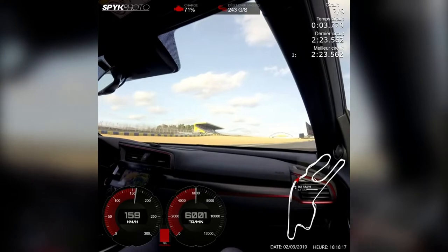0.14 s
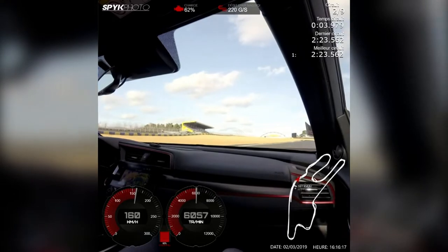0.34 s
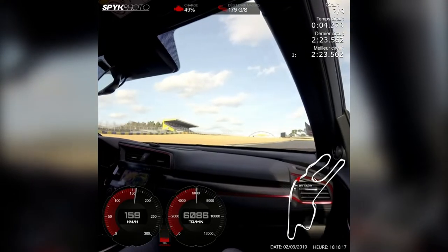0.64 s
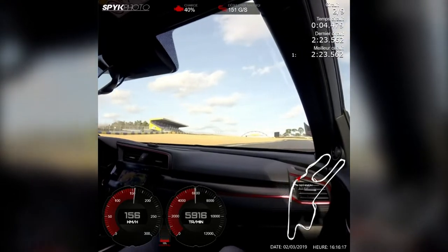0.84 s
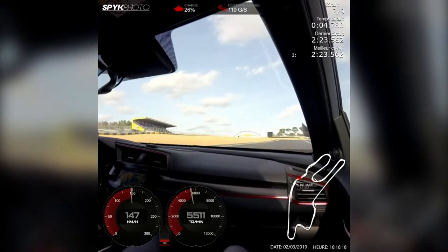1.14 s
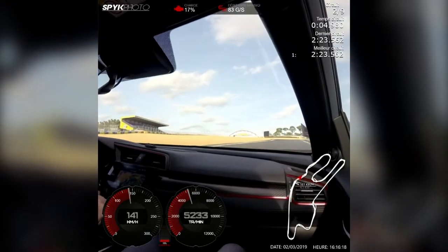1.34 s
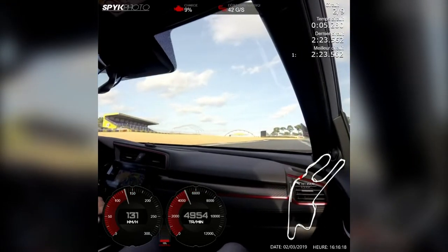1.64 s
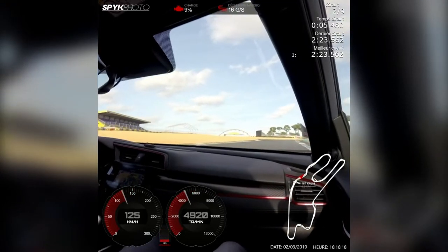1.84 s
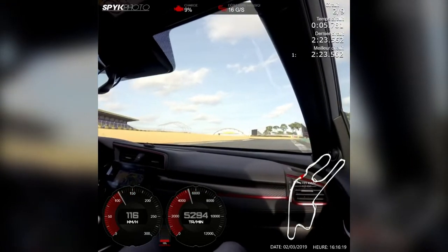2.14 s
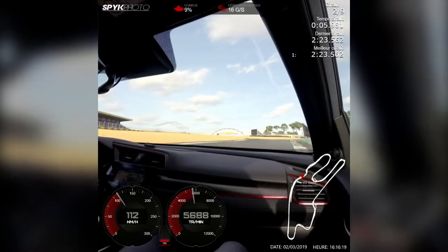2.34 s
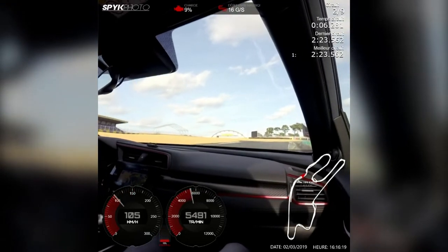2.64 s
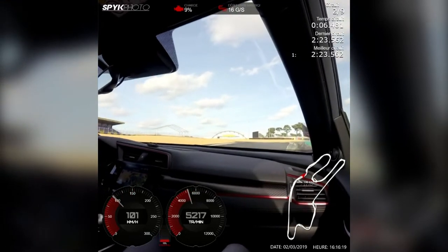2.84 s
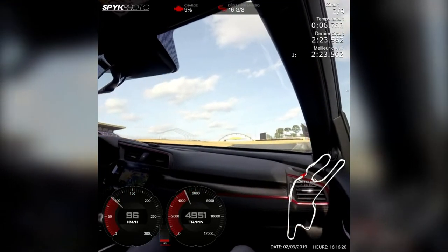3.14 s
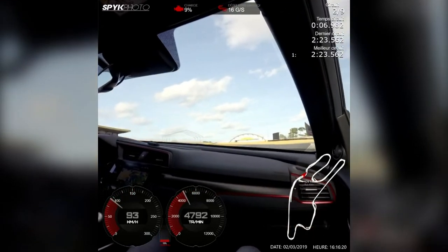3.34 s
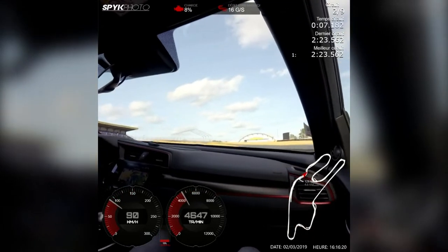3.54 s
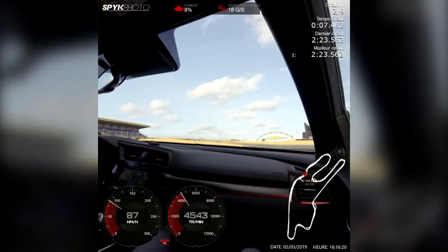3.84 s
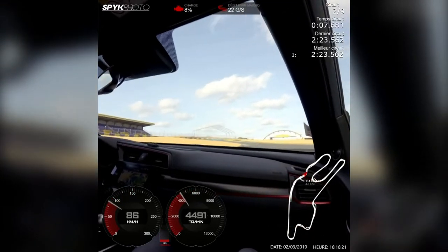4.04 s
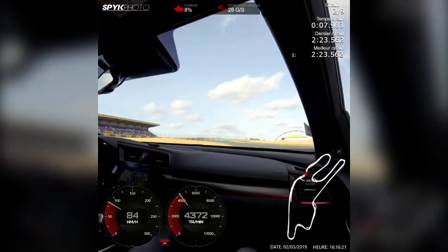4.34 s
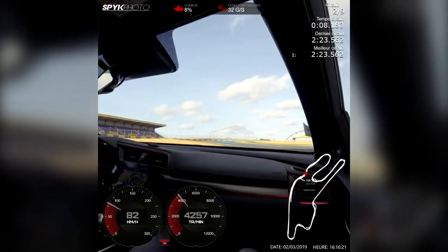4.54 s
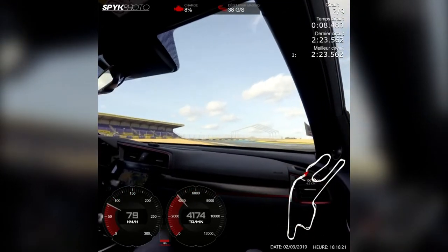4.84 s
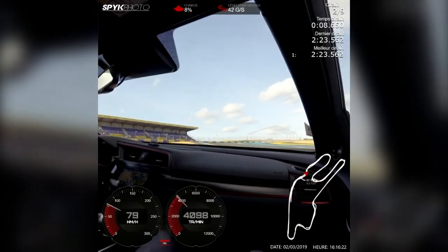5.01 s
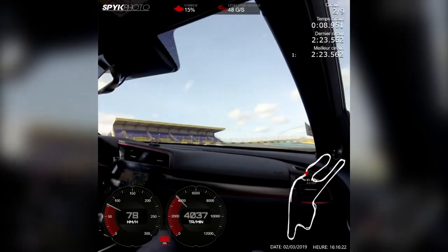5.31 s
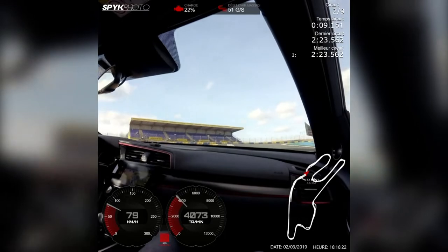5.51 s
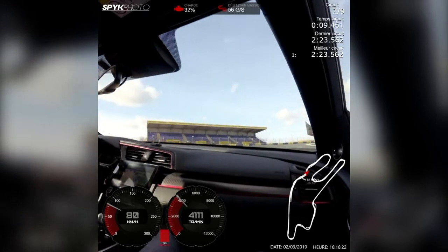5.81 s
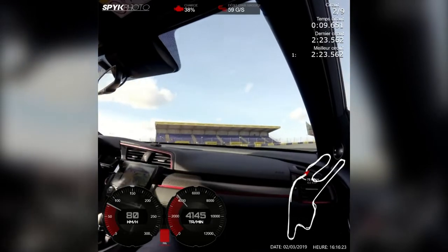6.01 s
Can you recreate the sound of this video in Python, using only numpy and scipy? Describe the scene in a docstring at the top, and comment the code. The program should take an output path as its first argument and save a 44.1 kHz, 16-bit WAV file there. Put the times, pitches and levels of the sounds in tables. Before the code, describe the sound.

The listener sits inside a turbocharged four-cylinder car on a race track, with short cabin reflections and a boomy body. From 0 to 0.7 s the engine runs flat out, high and raspy, over strong tyre roar and wind hiss. Around 0.6-0.9 s the throttle closes, the rasp drops away and a faint breathy turbo whistle slides down. The engine note falls under braking, with a trim rattle at 1.15 s and a bump at 1.5 s. From about 1.9 to 2.5 s it climbs in a downshift blip, then sinks. Between 2.7 and 3.9 s ribbed kerb blows drum heavily in bursts, with rattling plastic and a metallic clink near 3.45 s. At 4.07 s road noise drops sharply, then slowly returns over a low coasting drone. From 5.35 to 5.8 s uneven kerb thuds land with a faint tyre squeal; the engine rises slightly at the end.

```python
"""The engine of a turbocharged four-cylinder car drones, growls and rasps, heard from inside on a race track.
It runs flat out, brakes with a blip for the downshift, coasts and pulls lightly: sines and firing pulses.
Shaped noise makes tyre roar, wind and grit, which dip after the first kerb and slowly come back.
In two spells the wheels run over a ribbed kerb, a row of timed blows; bumps and trim are blows that ring
resonances too. Gliding tones make the turbo whistle and a faint tyre squeal."""
import sys
import numpy as np
from scipy import signal
from scipy.fft import rfft, irfft, next_fast_len
from scipy.io import wavfile
from scipy.ndimage import uniform_filter1d, map_coordinates

SR = 44100
rng = np.random.default_rng(int(sys.argv[2]) if len(sys.argv) > 2 else 0)


def transcribe(signal):
    """Save signal, clipped to [-1, 1], as a 16-bit WAV file at the path in sys.argv[1]."""
    frames = np.atleast_2d(signal).T
    limited = np.clip(frames, -1, 1)
    pcm = np.round(limited * 32767).astype(np.int16)
    wavfile.write(sys.argv[1], SR, pcm)


N = 272097


def amp(db):
    """Turn decibels into a gain."""
    return 10 ** (np.asarray(db) / 20)


def unit(x):
    """Scale to an rms of 1."""
    return x / np.sqrt(np.mean(x ** 2) + 1e-20)


def curves(rows):
    """Join the points of a table with straight lines: one curve for each column after the time."""
    times, *columns = np.transpose(rows)
    return [np.interp(np.arange(N) / SR, times, column) for column in columns]


def wobble(knots_per_s):
    """Draw a smooth curve through random knots."""
    knots = rng.standard_normal(int(N * knots_per_s / SR) + 4)
    return map_coordinates(knots, [np.arange(N) * knots_per_s / SR])


def swell(start, end, attack_s, release_s):
    """A gain that rises from start, holds until end and dies away."""
    t = np.arange(N) / SR
    rise = np.clip((t - start) / attack_s, 0, 1)
    return rise * np.exp(-np.maximum(t - end, 0) / release_s)


def filtered(x, response):
    """Multiply the spectrum of x by a response, given as a function of frequency in Hz."""
    m = next_fast_len(N + SR // 2)
    return irfft(rfft(x, m) * response(np.fft.rfftfreq(m, 1 / SR)), m)[:N]


def softened(x, corner_hz):
    """A yielding contact takes the edge off a blow: a gentle low-pass."""
    return filtered(x, lambda f: 1 / (1 + 1j * f / corner_hz) ** 2)


def coloured(x, spectrum):
    """Shape x by (frequency, level) points, then scale to an rms of 1."""
    hz, db = np.transpose(spectrum)
    return unit(filtered(x, lambda f: amp(np.interp(np.log(f + 1), np.log(hz), db))))


def resonate(x, modes):
    """Ring a set of resonances side by side, with alternating signs."""
    def response(f):
        total = 0
        for k, (hz, width_hz, db) in enumerate(modes):
            damping = 1j * f * width_hz
            total = total + (-1) ** k * amp(db) * damping / (hz * hz - f * f + damping)
        return total
    return filtered(x, response)


def rush(spectrum, patchy_db):
    """Noise of rms 1 whose gain varies in random patches of time and pitch."""
    grid = signal.stft(rng.standard_normal(N), nperseg=1024)[2]
    patches = uniform_filter1d(rng.standard_normal(grid.shape), size=6, axis=0)
    patches = uniform_filter1d(patches, size=7, axis=1)
    patchy = signal.istft(grid * amp(patchy_db * unit(patches)), nperseg=1024)[1][:N]
    return coloured(patchy, spectrum)


def passes(turns):
    """The sample times at which a turning phase completes each whole turn."""
    return np.interp(np.arange(1, int(turns[-1])), turns, np.arange(N))


def impulses(at, size):
    """Single clicks; a time between two samples is shared by both."""
    whole, part = np.divmod(np.clip(at, 0, N - 2), 1)
    whole = whole.astype(int)
    return np.bincount(whole, size * (1 - part), N) + np.bincount(whole + 1, size * part, N)


def bursts(at, sizes, t60, rise_s=0.00088):
    """Noise bursts that start at the given sample times and fall by 60 dB in t60 seconds."""
    t = np.arange(SR // 5) / SR
    fade = amp(-60 * t / t60) * (1 - np.exp(-t / rise_s))
    return signal.fftconvolve(impulses(at, sizes), fade)[:N] * rng.standard_normal(N)


def cabin(x, t60, wet):
    """Add dense, short reflections from glass and dashboard: a fading noise tail."""
    t = np.arange(SR // 5) / SR
    tail = rng.standard_normal(len(t)) * amp(-60 * t / t60)
    return x + wet * signal.fftconvolve(x, tail / np.linalg.norm(tail))[:N]


def whistle(rows, knots_per_s):
    """A narrow, breathy tone gliding along a table; more knots a second make it breathier."""
    hz, db = curves(rows)
    phase = 2 * np.pi * np.cumsum(hz) / SR
    return amp(db) * (wobble(knots_per_s) * np.sin(phase) + wobble(knots_per_s) * np.cos(phase))


# road noise without the kerbs; it dips sharply near 4.07 s, after the first kerb, and slowly recovers:
# (time [s], tyre roar level [dB], wind and grit hiss level [dB])
ROAD_NOISE = [(0, -27, -44.5), (.65, -26.5, -42), (.85, -28, -45), (1.6, -29, -47.5), (2.6, -31, -50.5),
              (3.3, -34, -49.5), (3.95, -35.5, -49.5), (4.07, -43, -61.5), (4.25, -39, -59),
              (4.75, -34, -57), (5.3, -29, -52), (6.17, -31.5, -52)]
# wheels on a kerb: (start [s], end [s], rise [s], thud level [dB], timing scatter of the ribs [s],
# share of suspension ringing [0-1], tread roar level [dB], grit hiss level [dB])
KERB_RIDES = [(2.695, 2.807, 0.046, -20, 0.0017, 0.1, -25.5, -51),
              (2.759, 3.204, 0.16, -8.5, .0006, .05, -29.5, -46),
              (3.349, 3.488, 0.031, -11.5, .0006, .1, -34.5, -52),
              (3.528, 3.787, 0.15, -9, 0.00046, 0.08, -32, -45.5),
              (5.35, 5.768, 0.2, -9.5, .005, 0.93, -32, -46.5)]
KERB_RELEASE_S = 0.12  # time constant of the shake dying away


def surface():
    """Gains of kerb shake, tread roar and hiss; road noise and kerbs add in power."""
    roar_db, hiss_db = curves(ROAD_NOISE)
    power = np.array([np.zeros(N), amp(roar_db), amp(hiss_db)]) ** 2
    for start, end, rise_s, thud_db, _, _, tread_db, grit_db in KERB_RIDES:
        gain = swell(start, end, rise_s, KERB_RELEASE_S)
        power = power + np.outer(amp([thud_db, tread_db, grit_db]), gain) ** 2
    return np.sqrt(power)


# noise spectra of body boom, tread roar, grit hiss and airy top: (frequency [Hz], relative level [dB])
BOOM_SPECTRUM = [(12, -38), (33, -6), (50, -19.5), (75, -7.5), (105, 2.5), (135, 0.5), (190, -2),
                 (230, -10), (300, -10.5), (360, -11), (440, -23), (900, -73)]
TREAD_SPECTRUM = [(200, -24.5), (380, 3.5), (470, 1.5), (680, 0.5), (740, -2), (840, -3), (1050, -5.5),
                  (1350, -10), (1500, -22.5), (2000, -23), (3000, -39.5), (8000, -67.5)]
GRIT_SPECTRUM = [(900, -28.5), (1600, 8), (2200, 2.5), (3200, 4), (4000, -0.5), (4800, -6.5), (5220, 1.5),
                 (5800, -4.5), (6500, -9.5), (7500, -18), (9000, -32.5), (15000, -50.5)]
AIR_SPECTRUM = [(3000, -23.5), (7000, 4.5), (9000, 2.5), (10800, 2), (13000, -2), (15000, -2)]
USUAL_ROAR_DB = -30  # boom and air are set for this tread roar
BOOM_DB, BOOM_GROWS = -19, .55  # boom at the usual roar; dB gained per dB of roar
KERB_BOOM_DB = -10  # boom relative to the kerb thuds


def road(shake, roar, hiss):
    """The road booms in the body and roars in the treads; wind and grit hiss at the glass."""
    roar_ratio = roar / amp(USUAL_ROAR_DB)
    boom_gain = np.hypot(amp(BOOM_DB) * roar_ratio ** BOOM_GROWS, amp(KERB_BOOM_DB) * shake)
    boom = boom_gain * rush(BOOM_SPECTRUM, patchy_db=1.5)
    treads = roar * amp(-0.34) * rush(TREAD_SPECTRUM, patchy_db=1.0)
    grit = hiss * amp(0.2 + 1.1 * wobble(60)) * rush(GRIT_SPECTRUM, patchy_db=1.1)
    air = amp(-64.5) * roar_ratio ** .45 * rush(AIR_SPECTRUM, patchy_db=2.5)
    return boom + treads + grit + air


# loose trim: (time [s], relative level [dB], knock against that level [dB], tick against that level [dB])
TRIM_RATTLES = [(0.6937, -28.5, 0.5, -25), (0.8731, -36.5, 0, -12), (1.1543, -21.5, -7.5, -17.5),
                (2.799, -35.5, -6, -13), (2.8893, -37.5, 10.5, -13), (3.176, -37.5, -1, -6),
                (3.342, -23.5, 4, -21.5), (3.3524, -28.5, -4.5, -6.5), (3.3828, -32, -3, -17),
                (3.4141, -37.5, 13.5, -17), (3.4535, -25.5, -2, -9.5), (3.4618, -28, -6, -13),
                (3.706, -31, 5, -24), (3.7703, -30, -2.5, -18.5), (4.5817, -34.5, 0.5, -14.5),
                (4.6813, -41, -6.5, -16), (4.815, -42.5, 0, -24), (5.046, -35, 3.5, -27.5),
                (5.0994, -38.5, -1.5, -19), (5.5502, -27, -7.5, -15.5), (5.6415, -28.5, 2, -30),
                (5.7573, -28, -1, -11), (5.807, -36.5, 2.5, -24)]
# small metal parts: (time [s], level [dB], pitch [Hz], time to fall 60 dB [s])
METAL_CLINKS = [(3.457, -33, 6884, 0.066), (4.592, -53, 7628, 0.14)]
# resonances of the trim, low to high: (frequency [Hz], width [Hz], relative level [dB])
KNOCK_MODES = [(1340, 130, 2.5), (2660, 620, -9), (3800, 850, -9)]
PLASTIC_MODES = [(5150, 360, 4), (6140, 980, -1.5), (7450, 1100, -9.5)]
TICK_MODES = [(7600, 840, -4), (10700, 1600, -7), (12500, 1000, -8)]
TICKS_PER_S = 24
# blow size of the loudest tick against the hiss; range below it; extra gain of its bright edge
TICKING_DB, TICKING_SPREAD_DB, TICKING_TOP_DB = 13.5, 18, -12.5


def trim(hiss):
    """Loose plastic chatters as noise bursts ring its resonances; small metal parts ring as sines."""
    t = np.arange(N) / SR
    times, db, knock_db, tick_db = np.transpose(TRIM_RATTLES)
    at = times * SR
    # the trim also keeps ticking at random times, harder where the hiss is louder
    chance = rng.random((int(TICKS_PER_S * N / SR), 2)).T
    tick_at = chance[0] * (N - 1)
    tick_size = hiss[tick_at.astype(int)] * amp(TICKING_DB - TICKING_SPREAD_DB * chance[1])
    ticking = bursts(tick_at, tick_size, t60=0.033)
    knock_blows = bursts(at, amp(db + knock_db + 14.5), t60=.05) + amp(-1.5) * ticking
    knock = softened(resonate(knock_blows, KNOCK_MODES), corner_hz=7050)
    clack_blows = bursts(at, amp(db + 2), t60=0.045) + ticking
    clack = softened(resonate(clack_blows, PLASTIC_MODES), corner_hz=11000)
    tick_blows = bursts(at, amp(db + tick_db + 12.5), t60=0.037) + amp(TICKING_TOP_DB) * ticking
    tick = softened(resonate(tick_blows, TICK_MODES), corner_hz=12000)
    metal = np.zeros(N)
    for start, level_db, hz, t60 in METAL_CLINKS:
        fade = (t > start) * amp(level_db - 60 * np.abs(t - start) / t60)
        metal += fade * np.sin(2 * np.pi * hz * (t - start))
    return cabin(knock + clack + tick + metal, t60=.05, wet=.35)


# blows through the suspension: (time [s], relative thud level [dB], relative knock level [dB])
ROAD_BUMPS = [(1.496, -6, -34.5), (2.633, -24, -18), (2.726, -13, -17), (3.063, -9.5, -17.5),
              (3.195, -11, -24.5), (3.375, -2, -37), (4.581, -6.5, -19.5), (5.046, -6.5, -22),
              (5.406, -21, -27), (5.554, -3.5, -23), (5.655, 2, -26)]
# resonances of suspension and body panels: (frequency [Hz], width [Hz], relative level [dB])
SUSPENSION_MODES = [(33, 9, -6.5), (51.7, 13, 1.5), (74.5, 17, 1), (95, 18.55, 3), (126, 16, 5),
                    (215, 26, -22)]
PANEL_MODES = [(560, 220, 0.5), (850, 270, 3.5), (1110, 280, -1.5)]


def bumps():
    """Each heavy blow rings the suspension as a thud and the body panels as a dull knock."""
    times, thud_db, knock_db = np.transpose(ROAD_BUMPS)
    thud = resonate(impulses(times * SR, amp(thud_db + 44.5)), SUSPENSION_MODES)
    knock = resonate(bursts(times * SR, amp(knock_db + 11.5), t60=0.057), PANEL_MODES)
    return softened(thud, corner_hz=700) + softened(knock, corner_hz=2500)


# the car slows for the corner: (time [s], wheel turns per second [Hz])
WHEEL_SPEED = [(0, 22.4), (.8, 22.1), (1.2, 19.8), (1.5, 18.5), (2, 16.3), (2.8, 13.75), (3.3, 12.75),
               (3.75, 12.05), (5.2, 12.2), (6.17, 11.4)]
# tyre hums, loudest at a cabin resonance: (resonance [Hz], half width [Hz], level at top speed [dB])
TYRE_HUMS = [(77, 4.1, -21), (93, 2.6, -19.5), (126.2, 6, -13.5)]
# hum cycles in one wheel turn, one for each hum: (order [cycles per turn])
TYRE_HUM_ORDERS = [4, 5, 6]
# the edge of the first kerb sets the air in the tyres ringing: (start [s], end [s], level [dB])
KERB_EDGE = (2.69, 2.8, -14.5)
# a tyre scrubs faintly in the corner: (time [s], pitch [Hz], relative level [dB])
TYRE_SQUEAL = [(5.3, 885, -76.5), (5.41, 855, -29.5), (5.48, 854, -37), (5.6, 821, -38.5),
               (5.78, 814, -40.5), (5.9, 804, -68)]
HUM_GROWS = 1.1  # power of the wheel speed
CAVITY_DB, CAVITY_GROWS = -29.5, 1  # air ringing at the usual roar; dB gained per dB of roar
KERB_CAVITY_DB = -13  # air ringing relative to the kerb thuds


def tyres(shake, roar):
    """Out-of-round tyres hum a few times a turn, the air inside them rings, and one scrubs."""
    wheel_hz, = curves(WHEEL_SPEED)
    angle = 2 * np.pi * np.cumsum(wheel_hz * (1 + 0.002 * wobble(16))) / SR
    hum = np.zeros(N)
    for order, (hz, half_width_hz, db) in zip(TYRE_HUM_ORDERS, TYRE_HUMS):
        closeness = 1 / np.hypot(1, (order * wheel_hz - hz) / half_width_hz)
        hum += amp(db + 0.53 * wobble(9.8)) * closeness * np.sin(order * angle)
    hum *= (wheel_hz / wheel_hz.max()) ** HUM_GROWS
    start, end, edge_db = KERB_EDGE
    road_ringing = amp(CAVITY_DB) * (roar / amp(USUAL_ROAR_DB)) ** CAVITY_GROWS
    ringing = np.hypot(road_ringing, amp(KERB_CAVITY_DB) * shake)
    ringing = np.hypot(ringing, amp(edge_db) * swell(start, end, attack_s=0.031, release_s=.04))
    tyre_air = resonate(rng.standard_normal(N), [(230.8, 9.2, 0)])
    cavity = ringing * unit(softened(tyre_air, corner_hz=327))
    return hum + cavity + whistle(TYRE_SQUEAL, knots_per_s=80)


# low resonances of the car body: (frequency [Hz], width [Hz], relative level [dB])
BODY_MODES = [(32.4, 8.5, -11.5), (74.3, 17, 1.5), (97.8, 20.3, 3.5), (173.2, 28, -7), (351, 110, -24)]
RIBS_PER_TURN = 2.65  # kerb ribs met in one wheel turn
RIB_SCATTER_DB, SLAP_DB = 2.5, -27.5  # spread from rib to rib; slap against the thud


def kerbs():
    """Each rib slaps the tyres and rings low resonances: evenly if ridden squarely, unevenly if clipped."""
    ribs = passes(RIBS_PER_TURN * np.cumsum(curves(WHEEL_SPEED)[0]) / SR)
    out = np.zeros(N)
    for start, end, rise_s, db, scatter_s, share, _, _ in KERB_RIDES:
        chance = rng.standard_normal((len(ribs), 2)).T
        at = ribs + scatter_s * SR * chance[0]
        size = amp(RIB_SCATTER_DB * chance[1])
        blows = impulses(at, size)
        ring = (1 - share) * resonate(blows, BODY_MODES) + share * resonate(blows, SUSPENSION_MODES)
        thuds = unit(softened(ring, corner_hz=604))
        slaps = amp(SLAP_DB) * coloured(bursts(at, size, t60=0.024), TREAD_SPECTRUM)
        # the ribs run throughout; this gain lets them sound only on the kerb
        out += amp(db) * swell(start, end, rise_s, KERB_RELEASE_S) * (thuds + slaps)
    return out


# the turbo runs down: (time [s], pitch [Hz], relative level [dB])
TURBO_WHISTLE = [(.55, 1850, -90), (.66, 1710, -56), (.8, 1510, -41), (.87, 1440, -49), (1, 1349, -96)]


def turbo():
    """A breathy whistle sinks as the throttle closes."""
    return whistle(TURBO_WHISTLE, knots_per_s=170)


# the four cylinders in firing order: (relative strength [gain], lateness [firing periods])
CYLINDER_FIRINGS = [(0.93, -0.0047), (0.77, 0.038), (0.86, -0.046), (0.74, 0.021)]


def firings(turns, scatter_db, jitter):
    """One pulse per firing; cylinders and burns differ in strength and timing (jitter in periods)."""
    at = passes(turns)
    strength, late = np.array(CYLINDER_FIRINGS)[np.arange(len(at)) % len(CYLINDER_FIRINGS)].T
    chance = rng.standard_normal((len(at), 2)).T
    fired_at = at + (late + jitter * chance[0]) * np.gradient(at)
    return impulses(fired_at, strength * amp(scatter_db * chance[1]))


# flat out, braking, downshift blip, coasting, light pull: (time [s], firing rate [Hz], tone level [dB])
ENGINE_RUN = [(0, 198.2, -19), (.35, 202.8, -32.5), (.65, 202.2, -28), (1.0, 197.6, -19.5),
              (1.2, 190.4, -21), (1.6, 165.3, -19), (1.85, 158.2, -24.5), (2.08, 165, -14),
              (2.3, 177.5, -20.5), (2.46, 194.2, -17), (2.65, 185, -14.5), (3.3, 161.9, -30.5),
              (4.08, 150.1, -26), (4.3, 147.5, -20), (4.58, 143.5, -19), (5.25, 135, -20.5),
              (5.85, 135.6, -24.5), (6.17, 140.6, -22.5)]
# exhaust growl: (time [s], relative level [dB])
EXHAUST_GROWL = [(0, -23.5), (.45, -17.5), (.8, -21.5), (1.4, -16.5), (2.9, -14.5), (3.5, -20.5),
                 (3.8, -20), (4.07, -35.5), (4.9, -31), (5.1, -23), (6.17, -23.5)]
# the rasp follows the throttle: (time [s], relative level [dB])
THROTTLE_RASP = [(0, -23.5), (.7, -22), (.8, -43), (2, -39.5), (2.35, -38), (3, -38), (4.1, -46.5),
                 (5.3, -49.5), (6.17, -45.5)]
# overtones sweeping through the cabin's resonances: (frequency [Hz], level under a light load [dB])
CABIN_OVERTONES = [(265, -28), (276, -25.5), (290, -34), (320, -39.5), (343, -27.5), (370, -39),
                   (405, -37.5), (445, -39), (475, -47.5), (505, -40), (555, -47), (595, -36), (620, -37)]
# spectra of growl and rasp: (frequency [Hz], relative level [dB])
EXHAUST_SPECTRUM = [(20, -40), (90, -23), (170, -1.5), (240, 2), (300, -1), (355, -2.5), (410, -20),
                    (470, -21.5), (600, -43), (1200, -61.5), (3000, -100)]
RASP_SPECTRUM = [(200, -50), (380, 3.5), (450, 0.5), (540, 0), (660, 7.5), (725, -5.5), (800, 10),
                 (950, -5), (1250, -10), (1550, -17), (1820, -13.5), (2050, -20.5), (2800, -21.5),
                 (3500, -30), (9000, -64)]
LIGHT_RASP_DB, OVERTONE_GROWS = -43, .25  # rasp under a light load; overtone dB gained per dB of rasp


def engine():
    """Clean firing tones, a lumpy exhaust growl and a rasp that opens with the throttle."""
    firing_hz, tone_db = curves(ENGINE_RUN)
    rasp_db, = curves(THROTTLE_RASP)
    turns = np.cumsum(firing_hz * (1 + .0012 * wobble(25))) / SR  # one turn per firing
    load_db = OVERTONE_GROWS * (rasp_db - LIGHT_RASP_DB)
    drone = np.zeros(N)
    for k in (1, 2, 3):
        db = tone_db if k == 1 else load_db + np.interp(k * firing_hz, *np.transpose(CABIN_OVERTONES))
        # higher harmonics waver more
        drone += amp(db + 0.55 * k * wobble(14)) * np.sqrt(2) * np.sin(2 * np.pi * k * turns)
    # taking out most of the even beat leaves the unevenness that fills the gaps between harmonics
    lumps = firings(turns, scatter_db=1.83, jitter=0.027) - 0.93 * impulses(passes(turns), 0.91)
    growl_gain = amp(curves(EXHAUST_GROWL)[0] - 2.5)
    growl = growl_gain * coloured(cabin(lumps, t60=0.022, wet=0.42), EXHAUST_SPECTRUM)
    # each burn also lets out a puff of turbulent gas
    puffs = unit((1 + np.cos(2 * np.pi * turns)) * rng.standard_normal(N))
    # part of the even beat is already in the drone; the bark carries the rest
    burns = firings(turns, scatter_db=1.6, jitter=.012) - .45 * impulses(passes(turns), 1)
    bark = unit(cabin(burns, t60=.04, wet=.9))
    rasp = amp(rasp_db - 3.0) * coloured(bark + 0.71 * puffs, RASP_SPECTRUM)
    return drone + growl + rasp


def scene():
    """Everything meets at one point in the cabin."""
    shake, roar, hiss = surface()
    ground = road(shake, roar, hiss) + tyres(shake, roar) + kerbs() + bumps()
    return (engine() + turbo() + ground + trim(hiss))[None]


TOP_HZ = 15000  # nothing is kept from here up


def record(dry):
    """Round off the heaviest peaks and cut the top of the treble."""
    held = dry[0] / (1 + np.abs(dry[0] / 1.15) ** 8) ** (1 / 8)
    return filtered(held, lambda hz: hz < TOP_HZ)[None]


dry = scene()
out = record(dry)
transcribe(out)
```